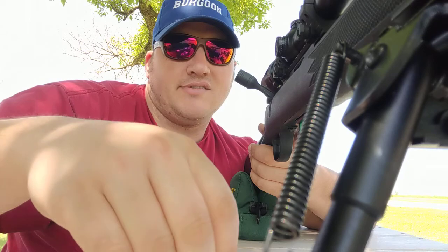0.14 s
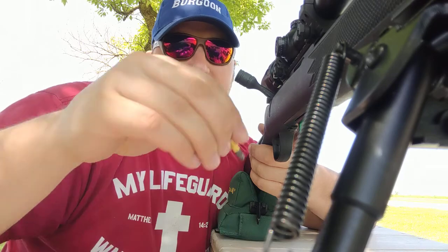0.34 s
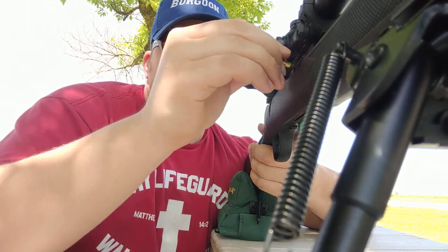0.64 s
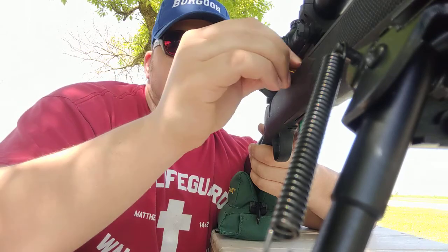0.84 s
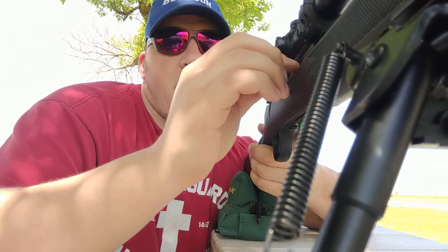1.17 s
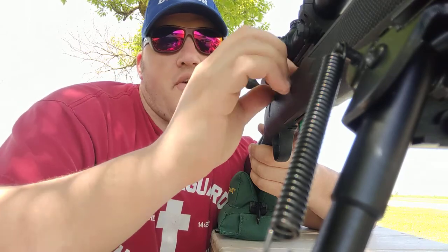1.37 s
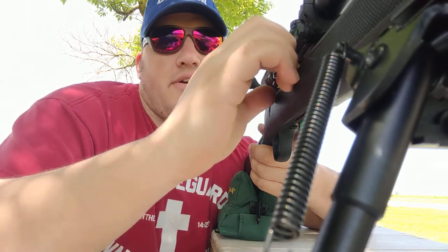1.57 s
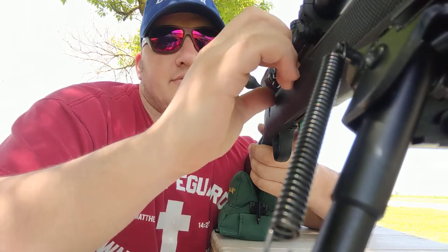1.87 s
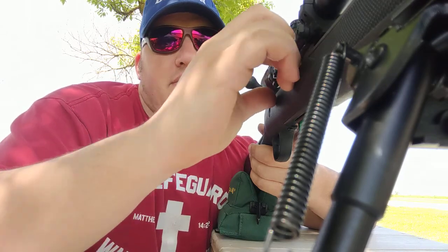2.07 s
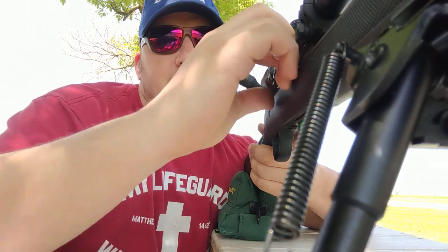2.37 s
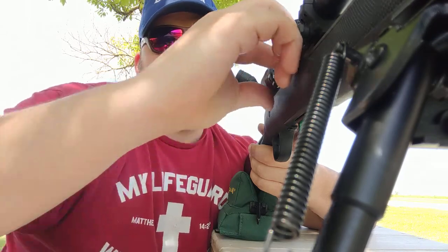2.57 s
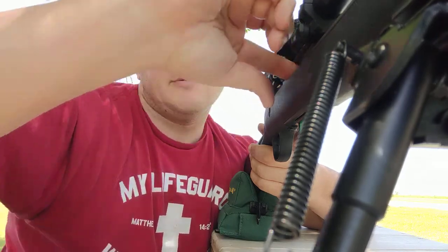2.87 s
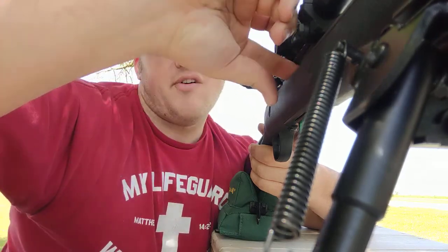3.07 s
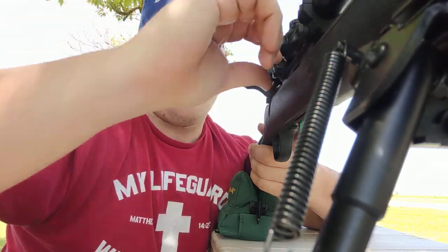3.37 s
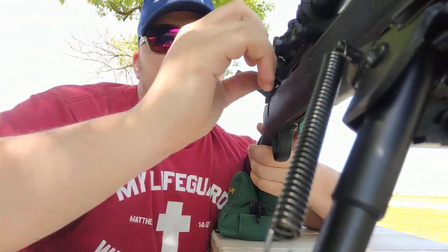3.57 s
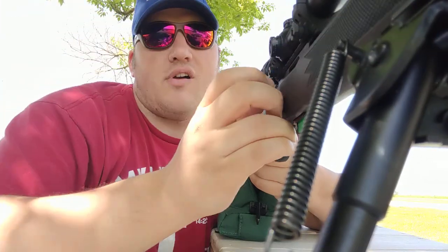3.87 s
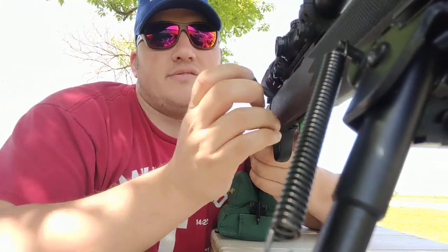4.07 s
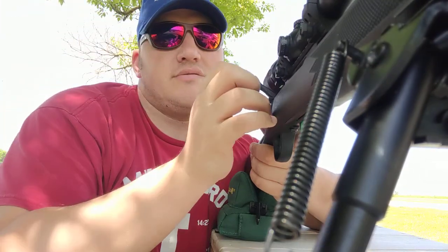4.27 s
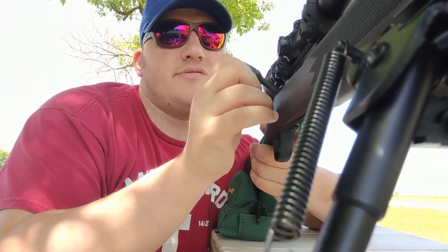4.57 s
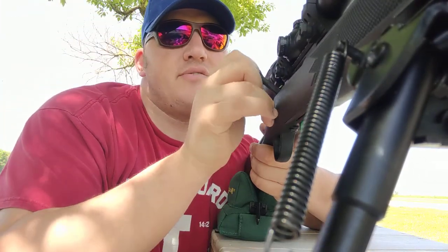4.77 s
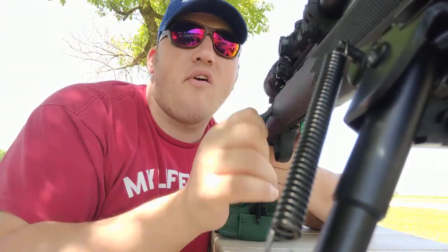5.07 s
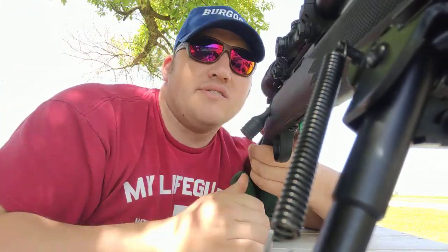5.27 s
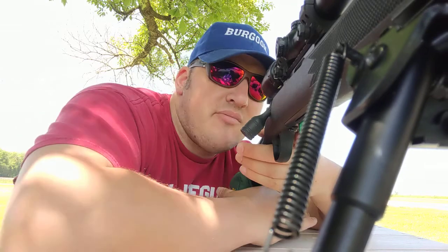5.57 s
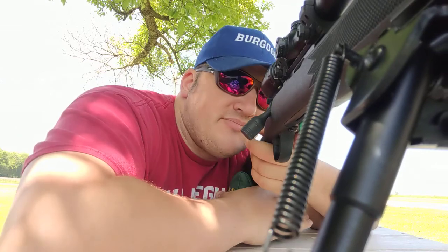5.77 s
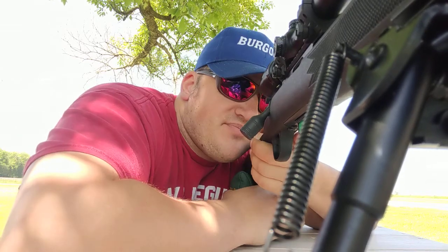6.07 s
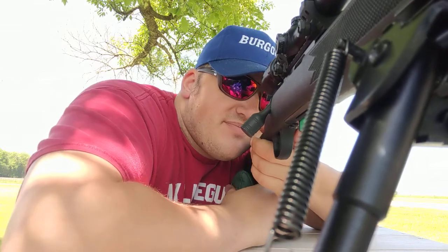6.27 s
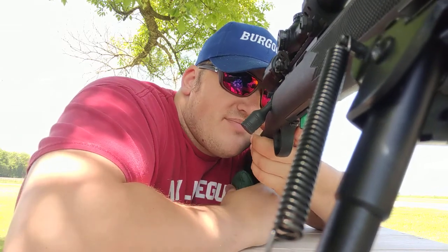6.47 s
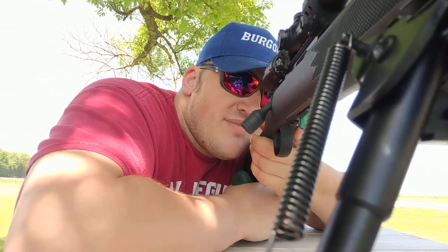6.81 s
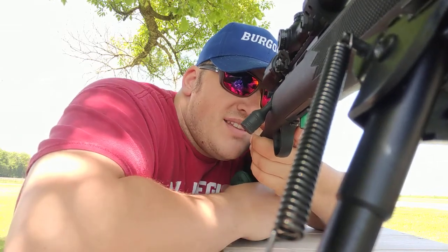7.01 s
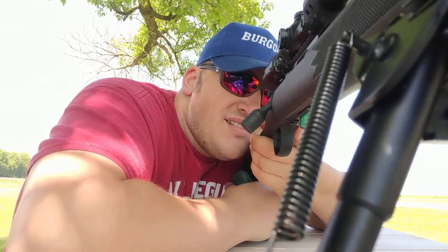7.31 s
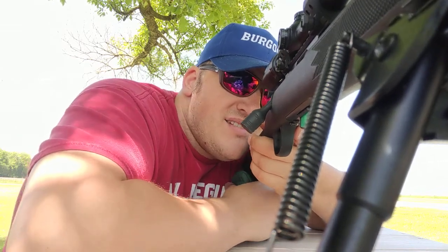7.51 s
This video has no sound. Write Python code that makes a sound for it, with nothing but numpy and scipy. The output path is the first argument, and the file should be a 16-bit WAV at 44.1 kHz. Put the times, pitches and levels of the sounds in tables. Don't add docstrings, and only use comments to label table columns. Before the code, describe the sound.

A quiet outdoor bench, heard through a small close microphone: thin steady air hiss, faint distant chirps, pips and hoarse trills throughout. From 0 to 0.4 s, very soft handling ticks, a brief rub and a low wind puff. Around 0.9 to 1.1 s, a cluster of tiny bright brass-on-steel ticks, then sparse faint taps until a clearer tick at 3.8 s. From 4.4 to 4.8 s the bolt is worked: a quick run of light metallic clicks with gritty sliding. At 4.91 s it strikes with a very loud, hard, slightly clipped clack, ringing stock and barrel briefly; two softer clacks follow at 5.09 and 5.16 s, the last with a short low thud. A small click at 5.36 s, then cloth rustling, a faint high sagging squeak near 6.25 s, and soft ticks around 7.1 and 7.4 s. Low wind buffets return from 5.5 s, strongest around 7.3 to 7.6 s.

```python
import sys
import numpy as np
from scipy import signal
from scipy.fft import rfft, irfft
from scipy.io import wavfile
from scipy.ndimage import uniform_filter1d

SR = 44100
rng = np.random.default_rng(int(sys.argv[2]) if len(sys.argv) > 2 else 0)


def magnitude_from_level(level_db):
    exponent = np.asarray(level_db, float) / 20
    return 10 ** exponent


def transcribe(u):
    v = np.clip(np.atleast_2d(u).T, -1, 1)
    q = np.round(v * 32767).astype(np.int16)
    wavfile.write(sys.argv[1], SR, q)


N = 337177


def evened(x):
    return x / np.sqrt(np.mean(x ** 2) + 1e-20)


def read(points, hz):
    f, value = np.transpose(points)
    return np.interp(np.log(hz + 1), np.log(f + 1), value)


def add(mix, s, sound):
    part = mix[max(round(s * SR), 0):][:len(sound)]
    part += sound[:len(part)]


def pass_filter(x, order, hz, kind):
    return signal.sosfilt(signal.butter(order, hz, kind, fs=SR, output="sos"), x)


def swell(start, hold, db, rise_db_per_s, fall_db_per_s):
    t = np.arange(N) / SR - start
    return magnitude_from_level(db - rise_db_per_s * np.maximum(-t, 0) - fall_db_per_s * np.maximum(t - hold, 0))


def hiss(spectrum, patchy_db, size):
    frames, hz = 4 * N // size + 5, np.fft.rfftfreq(size, 1 / SR)
    a, b, patches = rng.standard_normal((frames, len(hz), 3)).T
    patches = uniform_filter1d(patches, size=9, axis=0)
    patches = evened(uniform_filter1d(patches, size=9, axis=1))
    z = (a + 1j * b) * magnitude_from_level(read(spectrum, hz)[:, None] + patchy_db * patches)
    return evened(signal.istft(z, nperseg=size, noverlap=3 * size // 4)[1][:N])


def whistle(t, hz, db, waver=.01, smooth=150, flicker_db=1.5):
    shake = evened(uniform_filter1d(rng.standard_normal(len(t)), size=int(smooth)))
    phase = 2 * np.pi * np.cumsum(hz * (1 + waver * shake)) / SR
    return np.sqrt(2) * magnitude_from_level(db + flicker_db * shake[::-1]) * np.sin(phase)


# pitch in Hz, width in Hz (wider dies sooner), level in dB.
STOCK = [(475, 300, -18), (635, 200, -9), (950, 190, -9.5), (1323, 260, 2), (1555, 220, 2),
         (1928, 260, 0.5), (2126, 140, -2.5), (2358, 240, -1.5), (2642, 200, -4.5)]
# pitch in Hz, width in Hz, level in dB.
STEEL = [(2860, 140, -6), (3370, 200, -3.5), (4146, 350, -3), (4147, 240, 2), (4503, 300, -5),
         (5170, 180, -2.5), (6090, 1100, -1), (6100, 360, 2), (6900, 570, 5), (7180, 250, -2.5),
         (7400, 450, -1)]
# pitch in Hz, width in Hz, level in dB.
EDGE = [(7770, 2300, 3.5), (8590, 990, 5), (9370, 570, 1), (10030, 700, 2), (11300, 910, -3.5),
        (13460, 700, -9), (13700, 1300, -11), (15310, 590, -10)]


def contact(stock_db, steel_db, edge_db, chatter_ms, bright_hz, favoured=(), focus=0.23, damping=1.1, steady=1.3):
    t = np.arange(2200) / SR
    fade = np.exp(-(1000 * t / max(chatter_ms, .2)) ** steady)
    impacts = rng.standard_normal(len(t)) * np.sqrt(fade)
    for _ in range(6):
        spread = rfft(impacts)
        impacts = irfft(spread / (abs(spread) + 1e-9))
        impacts *= np.sqrt(fade / (abs(uniform_filter1d(impacts ** 2, size=60)) + 1e-12))
    impacts[0] += 1.4 * abs(impacts).max()
    out = np.zeros(len(t))
    for db, family, brief in ((stock_db, STOCK, 0), (steel_db, STEEL, .4), (edge_db, EDGE, .9)):
        modes = family + (list(favoured) if family is STOCK else [])
        hz, width, mode_db = np.transpose(modes)[:, :, None].astype(float)
        hz[:len(family)] *= 1 + 0.018 * rng.standard_normal((len(family), 1))
        if family is STEEL:
            mode_db = mode_db - np.minimum(6 * (np.log(hz / bright_hz) / focus) ** 2, 13)
        rank = np.argsort(np.argsort(hz, axis=0), axis=0)
        phase = 2 * np.pi * hz * t + np.pi * rank
        phase[len(family):] += np.pi / 2
        dying = np.exp(-np.pi * damping * width * t)
        crowded = dying + magnitude_from_level(2) * dying ** 4
        ring = (magnitude_from_level(mode_db) * crowded * np.sin(phase)).sum(0)
        ring *= 1 - np.exp(-t / 0.00018)
        ring = signal.fftconvolve(impacts * fade ** brief, ring)[:len(t)]
        out += magnitude_from_level(db) * ring / np.sqrt(np.mean(ring[:176] ** 2))
    return out


def touch(db, steel_db, sharp_db, chatter_ms, *favoured, **grip):
    steel = db + min(steel_db, 0)
    octaves = np.clip(steel_db, -10, 35) / 53.5 + (sharp_db + 5.5) / 56.5
    bright_hz = 4480 * 2 ** octaves
    return contact(db - max(steel_db, 0), steel, steel + sharp_db, chatter_ms, bright_hz, *favoured, **grip)


# start in seconds, strength in dB, steel over stock in dB,
# edge over steel in dB, chatter in ms.
CLACKS = [
    (4.9077, -6.5, -5, -8.5, 5.6),
    (4.916, -29.5, 3, -5.5, 8.6),
    (5.0888, -13.5, -6, -7.5, 7),
    (5.0975, -21, -4, -8.5, 4.5),
    (5.1564, -14, -5, -7.5, 7.5),
]
# pitch in Hz, width in Hz, level over the stock notes in dB.
FAVOURED = [
    [(1290, 130, 3), (1450, 110, 1), (1710, 110, 3), (2500, 300, 1), (4180, 160, 2.5), (5700, 200, 4),
     (6150, 160, 7), (7660, 200, 6)],
    [(6500, 340, 2), (7720, 340, 3)],
    [(1250, 176, 7), (1560, 140, 10), (2092, 93, 5), (2800, 250, 6), (3510, 150, 3), (3770, 160, 1.5),
     (5700, 200, 6), (5860, 360, -4), (7600, 300, 4)],
    [(1550, 160, 4), (2080, 250, 6), (5110, 340, 2), (5800, 340, 1), (7500, 400, 2)],
    [(583, 140, 0), (880, 200, 3), (1197, 200, 5.5), (1760, 150, 0), (2290, 200, 8), (2620, 180, 1.5),
     (4100, 250, 9), (6510, 230, 8), (7480, 300, 5)],
]


def clacks():
    out = np.zeros(N)
    for (s, *rest), favoured in zip(CLACKS, FAVOURED):
        add(out, s, touch(*rest, favoured, focus=0.79, damping=1.5, steady=3.4))
    return pass_filter(out, 3, 470, "high")


# start in seconds, peak in dB, pitch in Hz, seconds to fall 60 dB.
THUDS = [(4.909, -29.5, 127, 0.053), (5.159, -18.5, 230, 0.087), (5.159, -27.5, 163, 0.16),
         (5.159, -35.5, 85.7, 0.25), (4.912, -34.5, 163, .09), (4.485, -32, 480, 0.024),
         (4.657, -35.5, 770, 0.044), (4.659, -39, 490, .03), (3.027, -47, 850, 0.025)]
# peak in dB, pitch in Hz, seconds to fall 60 dB.
BARREL = [(-45, 594, .45), (-41, 856, .35), (-47, 1168, .55), (-52, 1647, .3), (-49, 2089, .4),
          (-51, 2789, .15)]


def thuds():
    out, t = np.zeros(N), np.arange(9000) / SR
    for s, db, hz, t60 in [(CLACKS[0][0], *mode) for mode in BARREL] + THUDS:
        gain = magnitude_from_level(db - 60 * t / t60) * (1 - np.exp(-t / .002))
        add(out, s, gain * whistle(t, hz, -4, waver=.002, smooth=550, flicker_db=2.2))
    return out


# start in seconds, strength in dB,
# steel over stock in dB, edge over steel in dB, chatter in ms.
CYCLING = [(3.95, -62, 0, -19, 6.5), (4.075, -61, 19, -25, 5.4), (4.221, -54, 6, -8, 1.5),
           (4.4224, -44, -3, -23, 2.9), (4.4783, -47.5, 9, -3, 3.8), (4.482, -41, -4, -17, 12),
           (4.4918, -40, -40, -10, 1.6), (4.517, -57, -17, -14, 5.4), (4.5262, -51, 1, -34, 4.5),
           (4.5498, -51, 9, -10, 4.4), (4.574, -42, 4, -3, 4), (4.6558, -39.5, -4, -24, 1.65),
           (4.6605, -42.5, -10, -19, 3.3), (4.781, -55.5, -5, -22, 0.79), (4.7847, -40.5, -7.5, -23, 3.7),
           (4.8972, -38.5, 0.5, -14, 6), (5.0694, -39, -4.5, -20.5, 3.5), (5.359, -44, 36.5, -17, .9),
           (5.844, -61, -1, -13.5, 2), (7.0728, -58, 15, -17, 2.3), (7.363, -56.5, 24, -20, 7.1),
           (7.384, -62, 21, -22, 2), (7.3936, -53, 24, -24, 1)]


def bolt_ticks():
    out = np.zeros(N)
    for s, *rest in CYCLING:
        add(out, s, touch(*rest, focus=.45, damping=1.6, steady=1.6))
    return out


# start in seconds, strength in dB,
# steel over stock in dB, edge over steel in dB, chatter in ms.
LOADING = [(0.013, -62, 14, -10, 5), (0.023, -55, -1, -23, 5.1), (0.195, -53.5, -2, -10, 10),
           (0.212, -56, 5, -8, 5.4), (0.2362, -52, 6, -12, 4), (0.867, -46, -2, -16, 3.7),
           (0.9748, -40.5, 14, -16, 2.3), (0.982, -43.5, 18, -19, 1.3), (0.986, -49.5, 5, -8, 3),
           (0.9962, -52, 5, -20, 4.4), (1.005, -52.5, 16, 2.5, 4.8), (1.0336, -47, 2, -4, 4.4),
           (1.0495, -49, -2, -4, 2.7), (1.0585, -51, 4, -38, 6.9), (1.0922, -71, 2, 7, 3.6),
           (1.494, -46.5, -6.5, -20, 4.2), (1.6742, -55.5, 2, -48, 1.2), (1.976, -57, -9, 0, 2.6),
           (2.101, -51.5, -6.5, -10, 3.6), (2.483, -62, 5, -15, 4), (3.027, -57.5, 1, -35, 1.3),
           (3.804, -53, 5, -11, 2.5), (3.81, -43, 20, -8, 1.04)]


def loading_ticks():
    out = np.zeros(N)
    for s, *rest in LOADING:
        add(out, s, touch(*rest, focus=.2, damping=1.5, steady=1.1))
    return pass_filter(out, 4, 1040, "high")


# pitch in Hz, seconds to fall 60 dB.
BENCH = [(300, 0.28), (1000, 0.062), (3000, 0.088), (7000, 0.14), (10000, 0.086), (16000, 0.033)]


def bench(x, start_s=0.0076):
    taps = np.zeros(SR // 2)
    at = np.arange(0, len(taps) - 20, 20)
    taps[at + rng.integers(0, 20, len(at))] = rng.choice([-1., 1.], len(at))
    hz, t, z = signal.stft(taps, SR, nperseg=256)
    tail = signal.istft(z * magnitude_from_level(-60 * t / read(BENCH, hz)[:, None]), SR, nperseg=256)[1]
    tail = np.r_[np.zeros(round(start_s * SR)), tail / np.linalg.norm(tail)]
    return signal.fftconvolve(x, tail)[:N]


# start in seconds, peak in dB, pitch in Hz, seconds to fall 60 dB.
TINGS = [(.198, -50, 4800, .04), (.2125, -49, 7450, .035), (.2375, -50, 4800, .035), (.02, -54, 3100, .04),
         (.9755, -42, 5250, .035), (2.4835, -55, 5900, .02), (3.8102, -35, 4500, .016),
         (3.8105, -45, 5450, .04), (3.8102, -39, 7100, .014), (6.185, -56, 5900, .04),
         (6.205, -57, 5800, .03), (4.5505, -47, 8000, .02), (4.5745, -30, 7600, .016),
         (4.5748, -30, 8800, .016), (4.5755, -31, 6600, .018), (4.527, -50, 3100, .03),
         (5.0715, -42, 2700, .025), (4.2215, -52, 5000, .01)]


def tings():
    out, t = np.zeros(N), np.arange(3000) / SR
    for s, db, hz, t60 in TINGS:
        gain = magnitude_from_level(db - 60 * t / t60) * (1 - np.exp(-t / .0004))
        add(out, s, gain * np.sin(2 * np.pi * hz * t))
    return out


def brief_ring(family):
    t, ring = np.arange(400) / SR, 0
    for k, (hz, width, db) in enumerate(family):
        ring = ring + (-1) ** k * magnitude_from_level(db) * np.exp(-np.pi * 2.5 * width * t) * np.sin(2 * np.pi * hz * t)
    return evened(ring)


# start in seconds, hold in seconds, strength in dB, steel over stock in dB.
SCRAPES = [(.006, 0.022, -55.5, 4), (0.193, 0.042, -56.5, -5), (4.43, 0.016, -56.5, -11),
           (4.495, .045, -54, -7), (4.553, .035, -59, 4), (4.917, 0.0074, -41.5, 14),
           (4.932, 0.0072, -47, 9.5), (4.954, 0.03, -53, 13.5), (5.015, .045, -57.5, 8),
           (5.104, 0.0087, -38.5, -2), (5.161, .009, -33.5, 1), (5.172, 0.0082, -51, 6)]


def scrapes():
    out, t = np.zeros(N), np.arange(6000) / SR
    stock, steel = brief_ring(STOCK[2:]), brief_ring(STEEL + EDGE[:4])
    for s, hold, db, steel_db in SCRAPES:
        hit, size, sign = rng.random((len(t), 3)).T
        grit = (hit < 5000 / SR) * magnitude_from_level(-3 * np.log(size + 1e-3)) * np.sign(sign - .5)
        ring = magnitude_from_level(-max(steel_db, 0)) * stock + magnitude_from_level(min(steel_db, 0)) * steel
        sound = evened(signal.fftconvolve(grit, ring)[:len(t)])
        gain = np.minimum(t / .003, 1) * magnitude_from_level(db - 700 * np.maximum(t - hold, 0))
        add(out, s, sound * gain)
    return pass_filter(out, 4, 11000, "low")


# start in seconds, hold in seconds, strength in dB, bright hiss over dull rub in dB.
RUBS = [(0.004, 0.023, -57, -4), (0.13, 0.026, -57.5, -1), (0.214, 0.011, -47.5, -13),
        (0.966, 0.033, -61, -6), (1.067, 0.072, -60, -16), (1.22, 0.067, -65, -8), (3.814, 0.05, -59.5, -5),
        (3.928, 0.041, -54.5, -24), (4.438, 0.0071, -53, -8), (4.5, 0.1, -54, -7.5), (4.9, 0.028, -43, -2),
        (4.95, 0.13, -51.5, -7), (5.087, 0.046, -44.5, -16), (5.165, 0.021, -45.5, -14),
        (5.232, 0.11, -54.5, -12), (5.377, 0.1, -56.5, 0.5), (5.551, 0.14, -62.5, 1),
        (5.798, 0.13, -64, 14), (6.004, 0.018, -60.5, 4), (6.088, 0.037, -48.5, -15.5),
        (6.173, 0.061, -55.5, 3), (6.272, 0.15, -66.5, -2.5), (6.65, 0.37, -64, -1.5),
        (7.07, 0.13, -54, -8.5), (7.347, 0.04, -68.5, 18)]
# pitch in Hz, level in dB.
DULL = [(120, -30), (220, 6), (500, 2.5), (1000, -3), (1600, -5.5), (2500, -9.5), (3500, -33)]
# pitch in Hz, level in dB.
BRIGHT = [(1500, -24), (2600, 0), (4500, 1.5), (5200, -2), (6200, 0.5), (7600, -0.5), (8600, -8),
          (11000, -13.5), (15500, -27)]


def rubs():
    out, dull, bright = np.zeros(N), hiss(DULL, 2.2, size=256), hiss(BRIGHT, 2.6, size=256)
    for s, hold, db, bright_db in RUBS:
        rub = magnitude_from_level(-max(bright_db, 0) - 6.5) * dull + magnitude_from_level(min(bright_db, 0) - 3.5) * bright
        out += rub * swell(s, hold, db, rise_db_per_s=599, fall_db_per_s=304.5)
    return out


# multiple of the main pitch, level in dB.
SQUEAK_PARTIALS = [
    (.5, -10),
    (1, 1.5),
    (1.5, -10),
]


def squeak():
    t, start_s, note = np.arange(N) / SR, 6.245, 0
    hz = 3800 - 330 * (t - start_s)
    for multiple, db in SQUEAK_PARTIALS:
        note = note + whistle(t, multiple * hz, db, waver=.0008, smooth=600, flicker_db=1.5)
    stop = 1 - 0.69 * np.clip((t - 6.366) / .008, 0, 1)
    return note * stop * swell(start_s, hold=0.05, db=-59, rise_db_per_s=181, fall_db_per_s=89.5)


# start in seconds, hold in seconds, strength in dB.
GUSTS = [(0.218, 0.013, -52), (0.295, 0.11, -53), (0.93, 0.014, -62), (1.009, 0.083, -59),
         (4.53, 0.04, -56), (5.254, 0.24, -57), (5.526, 0.052, -53), (5.702, 0.026, -50),
         (5.788, .012, -58), (5.851, 0.078, -51), (6.089, 0.05, -46), (6.18, 0.046, -55),
         (6.342, 0.022, -60), (6.948, 0.045, -43), (7.089, 0.018, -58), (7.301, 0.06, -43),
         (7.389, .1, -48), (7.52, 0.02, -46), (7.634, .03, -50)]
# pitch in Hz, level in dB per Hz.
BUFFET = [(12, -51), (20, -9), (40, -25), (59, 7.5), (114, 1.5), (195, -7.5), (288, -22.5), (425, -41),
          (500, -75), (650, -75), (1100, -120)]


def wind():
    lumps = hiss(BUFFET, 3.9, size=2048)
    power = uniform_filter1d(uniform_filter1d(lumps ** 2, size=1200), size=1200)
    lumps = lumps / np.sqrt(abs(power) + .05)
    return lumps * sum(swell(*gust, rise_db_per_s=501, fall_db_per_s=358) for gust in GUSTS)


# middle in seconds, peak in dB, pitch in Hz.
EDDIES = [(.297, -37, 90), (.325, -35.5, 90), (.36, -41, 90), (.385, -35.5, 75), (.41, -35, 90),
          (.43, -42, 70), (.95, -46, 70), (1.012, -42, 70), (1.038, -40, 75), (1.082, -41, 85),
          (4.552, -42, 60), (5.53, -42, 80), (5.708, -35, 90), (5.73, -31, 105), (5.785, -41, 100),
          (5.848, -39, 70), (5.89, -36, 110), (5.935, -38, 70), (6.105, -35, 80), (7.05, -42, 80),
          (7.105, -40, 70), (7.289, -32, 110), (7.318, -30.5, 120), (7.36, -35, 80), (7.393, -37, 80),
          (7.45, -39, 110), (7.497, -32, 100), (7.525, -34, 80), (7.551, -27, 125), (7.632, -35, 70)]


def eddies():
    out, t = np.zeros(N), np.arange(-1500, 1500) / SR
    for (s, db, hz), turn in zip(EDDIES, rng.random(len(EDDIES))):
        bump = magnitude_from_level(db) * np.exp(-(t * hz / .75) ** 2)
        add(out, s + t[0], bump * np.cos(2 * np.pi * (hz * t + turn)))
    return out


# start in seconds, level in dB.
CHIRPS = [(2.318, -58), (3.44, -58.5), (5.329, -55.5), (7.318, -55.5)]
# delay in seconds, rise in seconds, fall in seconds, top pitch in Hz, level in dB.
SYLLABLES = [
    (0.001, .02, .045, 5410, -5),
    (.058, .015, .006, 3620, -8),
    (.077, .027, 0.018, 4350, -1),
]


def warbles():
    out, low_hz = np.zeros(N), 3120
    top_loss_db, second_voice_db = (-1, 0, -10.5), (-3, -20, -7)
    for start, call_db in CHIRPS:
        for (offset, rise, fall, top_hz, db), loss_db, upper_db in zip(SYLLABLES, top_loss_db, second_voice_db):
            t = np.arange(0, rise + fall, 1 / SR)
            arch = np.interp(t, [0, rise, rise + fall], [0, 1, 0])
            arch = np.where(t < rise, arch, arch ** 0.89)
            soft_start_db = 16 * np.maximum(1 - t / SYLLABLES[0][1] - offset * 20, 0)
            level_db = call_db + db + loss_db * arch - soft_start_db
            span_hz = top_hz - low_hz
            call = whistle(t, low_hz + span_hz * arch, level_db, waver=0.0248, smooth=67, flicker_db=4.5)
            upper_hz = top_hz * 1.03 - span_hz * 0.56 * (1 - arch)
            upper = whistle(t, upper_hz, level_db + upper_db, waver=0.038, smooth=54, flicker_db=3.0)
            call += (t > rise) * upper
            add(out, start + offset, call * signal.windows.tukey(len(t), .2))
    return out


# start in seconds, length in seconds, level in dB.
PIPS = [(0.465, 0.04, -66.5), (1.456, 0.045, -61.5), (1.833, 0.019, -65.5), (2.018, .021, -72),
        (2.072, 0.035, -67), (2.554, 0.078, -72), (2.878, .045, -67.5), (3.622, 0.026, -65),
        (4.08, .025, -70), (4.534, .044, -65)]
# start in seconds, length in seconds, first pitch in Hz, last pitch in Hz, level in dB.
GLIDES = [(1.504, 0.038, 2940, 2930, -67.5), (2.054, 0.057, 2870, 3000, -68),
          (3.62, 0.062, 4300, 3440, -74), (4.009, 0.068, 4110, 2860, -72), (4.437, 0.052, 4296, 4220, -69),
          (3.566, .027, 4600, 5300, -69), (3.022, 0.039, 4800, 5340, -72), (4.59, 0.039, 4300, 4700, -69),
          (4.676, 0.058, 4560, 5050, -71), (4.721, 0.056, 5080, 3840, -69), (6.9, 0.12, 3600, 3520, -77),
          (7.298, 0.032, 3000, 3620, -74.5), (7.299, 0.034, 5640, 7090, -69)]


def pips_and_glides():
    out, pip_hz = np.zeros(N), 5230
    pips = [(s, length, pip_hz, pip_hz, db) for s, length, db in PIPS]
    for start, length, start_hz, end_hz, db in GLIDES + pips:
        t = np.arange(0, length, 1 / SR)
        note = whistle(t, np.linspace(start_hz, end_hz, len(t)), db, waver=0.0027, flicker_db=3.5)
        add(out, start, note * signal.windows.tukey(len(t), .4))
    return out


def birds():
    calls, t = warbles() + pips_and_glides(), np.arange(6000) / SR
    trees = rng.standard_normal(len(t)) * magnitude_from_level(-60 * t / .18)
    trees[round(.011 * SR)] += 16
    return calls + magnitude_from_level(-4.0) * signal.fftconvolve(calls, trees / np.linalg.norm(trees))[:N]


# start in seconds, length in seconds, level in dB.
BUZZES = [(0.046, 0.23, -69), (1.358, .12, -67.5), (2.547, 0.098, -75), (3.081, 0.17, -68),
          (3.848, 0.2, -69.5), (4.232, 0.19, -67), (5.88, 0.17, -72), (6.859, .17, -69.5)]
# pitch in Hz, width in Hz, level in dB.
BUZZ = [(2750, 350, -8), (3550, 330, -2), (4500, 480, 0), (5300, 260, -4)]


def buzzes():
    out, hz = np.zeros(N), np.fft.rfftfreq(16384, 1 / SR)
    bands = sum(magnitude_from_level(db) / (1 + (2 * (hz - centre_hz) / width) ** 2) for centre_hz, width, db in BUZZ)
    for start, length, db in BUZZES:
        t = np.arange(0, length, 1 / SR)
        rasp = evened(irfft(bands * rfft(rng.standard_normal(16384))))[:len(t)]
        throb = magnitude_from_level(db + 1.6 * np.sin(2 * np.pi * 33 * t))
        add(out, start, throb * rasp * signal.windows.tukey(len(t), .3))
    return out


# pitch in Hz, level in dB per Hz.
AIR = [(25, -18), (45, 8), (75, 17.5), (135, 13), (190, 2), (300, 0.5), (700, -2.5), (1000, -5.5),
       (2400, -9.5), (5000, -13), (7800, -16), (8500, -21.5), (15500, -19.5), (16500, -21)]


def air():
    return magnitude_from_level(-56.5) * hiss(AIR, .9, size=2048)


def scene():
    rifle = clacks() + thuds() + bolt_ticks() + loading_ticks()
    mix = rifle + magnitude_from_level(-24.0) * bench(rifle) + tings() + scrapes()
    mix += rubs() + squeak()
    mix += wind() + eddies()
    mix += birds() + buzzes() + air()
    return mix[None]


def roll_off(x):
    return signal.sosfilt(signal.butter(12, 16840, fs=SR, output="sos"), x)


def record(dry):
    thin = pass_filter(dry, 4, 38, "high")
    ceiling = .72
    flattened = thin / (1 + abs(thin / ceiling) ** 4) ** .25
    treble_limit = signal.firwin(255, 15850, window=("kaiser", 6), fs=SR)
    limited = signal.oaconvolve(flattened, treble_limit[None], "same")
    return roll_off(limited)


dry = scene()
out = record(dry)
transcribe(out)
```